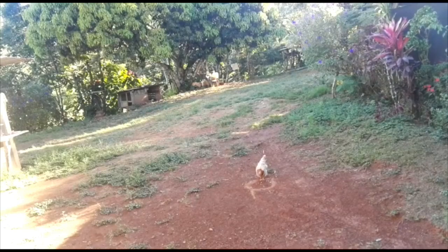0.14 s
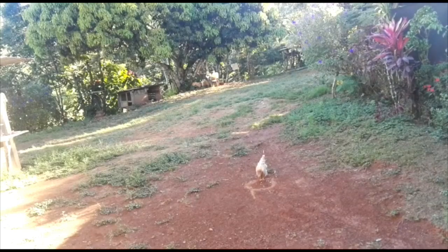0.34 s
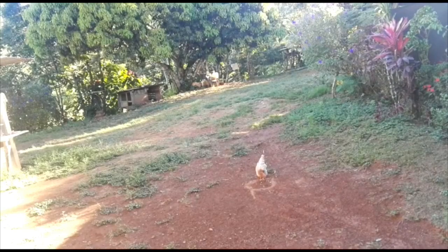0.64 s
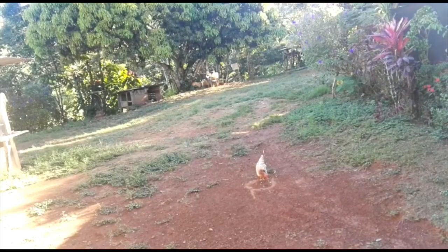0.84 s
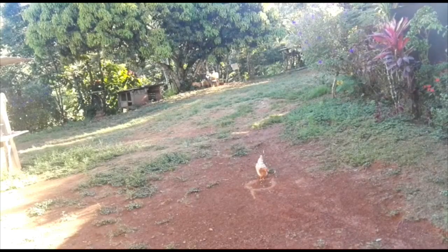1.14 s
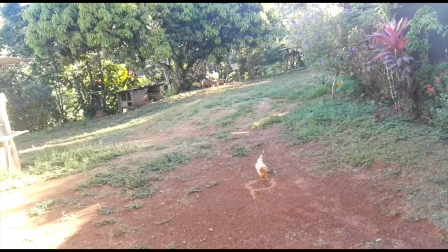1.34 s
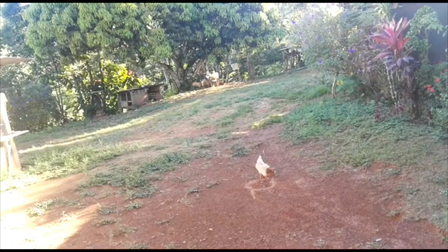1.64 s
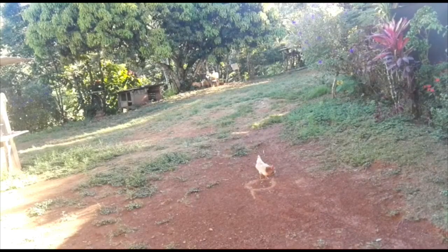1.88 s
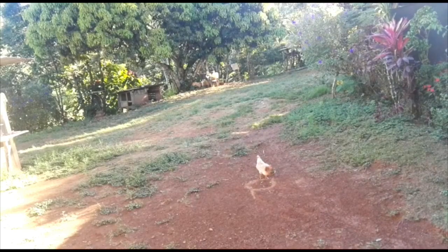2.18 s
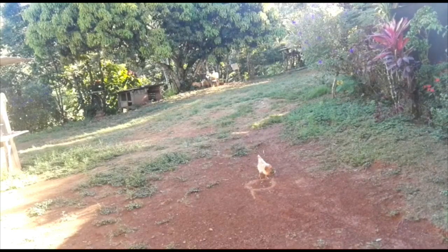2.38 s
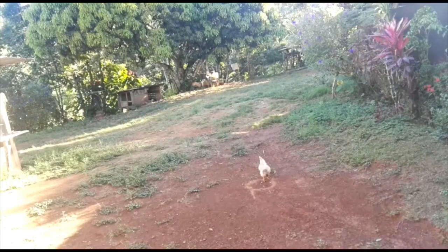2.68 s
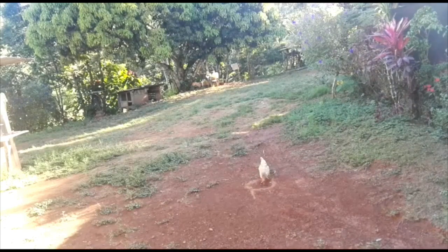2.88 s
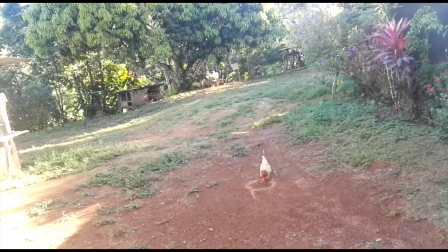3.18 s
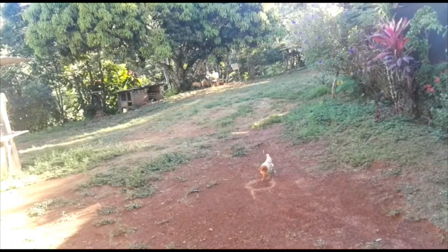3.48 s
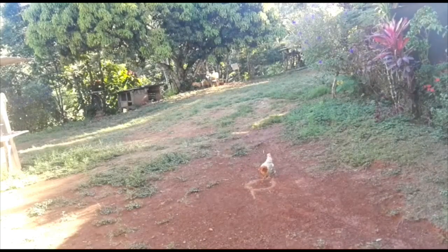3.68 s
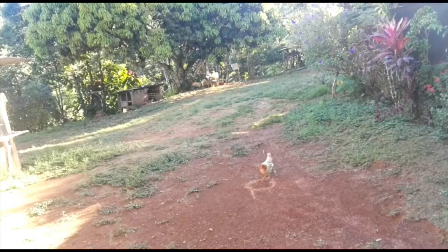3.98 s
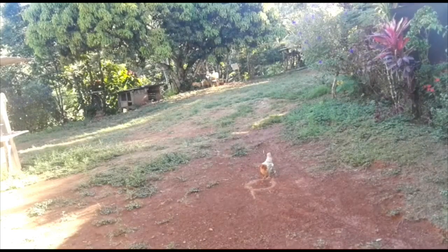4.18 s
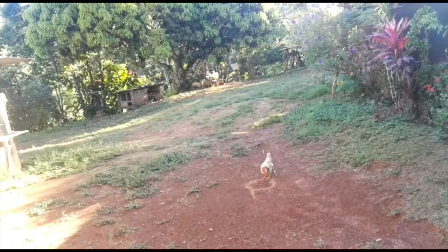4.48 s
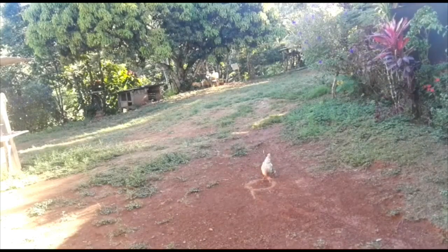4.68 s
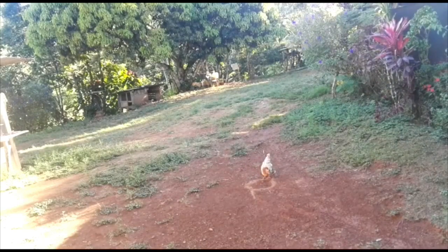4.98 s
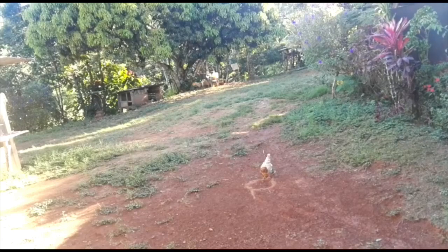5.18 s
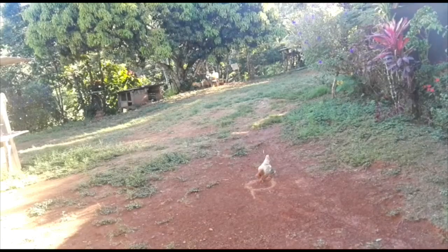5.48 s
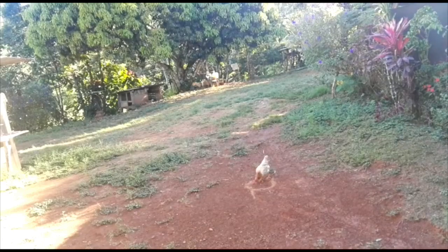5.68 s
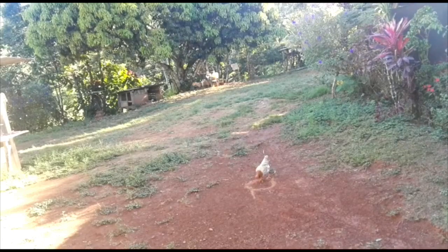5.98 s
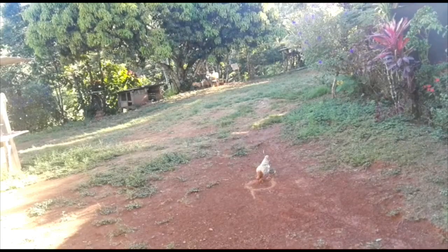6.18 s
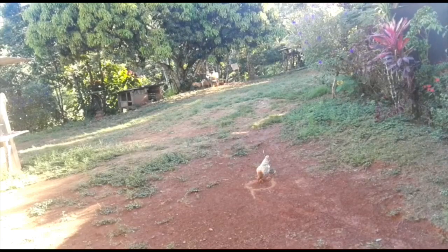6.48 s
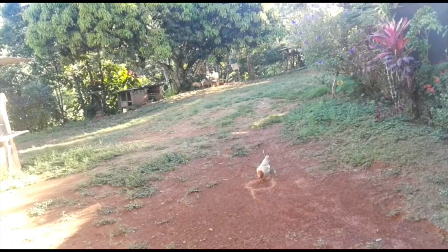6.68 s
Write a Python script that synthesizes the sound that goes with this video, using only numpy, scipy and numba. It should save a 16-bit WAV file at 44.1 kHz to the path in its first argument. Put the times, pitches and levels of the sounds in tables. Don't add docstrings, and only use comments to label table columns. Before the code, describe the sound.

A distant-to-middle-distance chicken calls in a grassy yard, picked up by a stereo microphone with soft air noise and muffled handling thumps. One long, rough squawk comes early; a few low clucks fill the pause; another long squawk starts strongly and turns ragged; a short dying squawk comes last. Trees return a faint diffuse echo, and high insects trill throughout.

```python
import sys
import numpy as np
from scipy import signal
from scipy.io import wavfile
from scipy.ndimage import uniform_filter1d
from numba import njit

SR = 44100
rng = np.random.default_rng(int(sys.argv[2]) if len(sys.argv) > 2 else 0)


def to_linear_factor(level_db):
    exponent = np.asarray(level_db, float) / 20
    return 10 ** exponent


def log_audio(samples):
    frames = np.atleast_2d(samples).T
    limited = np.clip(frames, -1, 1)
    pcm = np.round(limited * 32767).astype(np.int16)
    wavfile.write(sys.argv[1], SR, pcm)


N = 301644
T = np.arange(N) / SR
LEFT_LAG = 26


def rms_one(x):
    return x / np.sqrt(np.mean(x ** 2) + 1e-20)


def in_time(rows):
    s, *columns = np.transpose(rows)
    return [np.interp(T, s, c) for c in columns]


def gate(start, end, fade):
    return np.clip(np.minimum(T - start, end - T) / fade, 0, 1)


def drift(rate_hz):
    r = np.exp(-2 * np.pi * rate_hz / SR)
    noise = rng.standard_normal(N + SR)
    return rms_one(signal.lfilter([1], [1, -2 * r, r * r], noise)[SR:])


def resonance(x, hz, width_hz):
    r = np.exp(-np.pi * width_hz / SR)
    poles = [1, -2 * r * np.cos(2 * np.pi * hz / SR), r * r]
    return signal.lfilter([(1 - r * r) / 2, 0, (r * r - 1) / 2], poles, x + 1e-18)


def double_resonance(x, hz, width_hz):
    return resonance(resonance(x, hz, width_hz), hz, 2 * width_hz)


def band(x, low_hz, high_hz):
    return signal.sosfilt(signal.butter(2, [low_hz, high_hz], "band", fs=SR, output="sos"), x)


def even(x):
    return x / np.sqrt(uniform_filter1d(x ** 2, size=1800) + 1e-12)


def pan(x, left_db, lag=LEFT_LAG):
    left = np.roll(x, round(lag)) * to_linear_factor(left_db / 2)
    right = x * to_linear_factor(-left_db / 2)
    return np.array([left, right])


def pulses(cycles, count):
    turn = np.pi * (cycles % 1) + 1e-9
    return (np.sin((2 * count + 1) * turn) / np.sin(turn) - 1) / 2


def air(patchy_db):
    # frequency in Hz, level in dB per Hz.
    spectrum = [(25, -6.5), (50, 0), (80, -5.5), (200, -6), (400, -5), (1000, -4.5), (1700, -8.5),
                (2600, -12), (4500, -17), (6000, -14), (8000, -11.5), (11000, -25.5), (13400, -18),
                (14000, -20)]
    # frequency in Hz, left-right likeness from -1 to 1.
    likeness = [(60, 0.94), (130, 0.93), (280, 0.48), (620, -0.73), (1340, 0.3), (2920, -0.12),
                (6350, 0.096), (13800, 0.066)]
    # frequency in Hz, width in Hz, depth as a share (below 0 a hump).
    dips = [(5650, 510, 1), (7910, 3300, 0.82), (13800, 770, -0.88)]
    spectrum_hz, spectrum_db = np.transpose(spectrum)
    likeness_hz, likeness_share = np.transpose(likeness)
    out, edges, white = 0, 25 * 2 ** np.arange(0, 9.6, .5), rng.standard_normal((2, 2, N))
    together = drift(0.48)
    for k, (low, high) in enumerate(zip(edges, edges[1:])):
        mid, side = band(white[k % 2], low, high)
        at = np.log(low * high) / 2
        alike = np.clip(np.interp(at, np.log(likeness_hz), likeness_share), -1, 1)
        gain = to_linear_factor(np.interp(at, np.log(spectrum_hz), spectrum_db) + patchy_db * together)
        out = out + gain * (np.sqrt(1 + alike) * mid + np.sqrt(1 - alike) * side * [[1], [-1]])
    for hz, width_hz, depth in dips:
        out = out - depth * resonance(out, hz, width_hz)
    return to_linear_factor(-67) * rms_one(out)


def hum():
    # start in seconds, length in seconds, low mode in dB, upper modes in dB.
    rubs = [(-.05, 0.13, -67, -78), (0.524, 0.52, -75.5, -66.5), (1.0, 0.43, -71, -66.5),
            (1.838, 0.38, -60.5, -57), (2.19, 0.49, -68.5, -70.5), (2.758, .2, -61, -66),
            (2.901, 0.23, -70.5, -59), (3.367, 0.18, -61.5, -66), (3.591, 0.12, -62, -60),
            (4.35, 0.6, -75, -64.5), (5.8, .12, -65, -58), (5.951, 0.13, -69, -66.5)]
    # frequency in Hz, width in Hz, level in dB.
    body_modes = [(120.8, 29, -6.5), (207.5, 28.7, -7), (460.3, 39, -17), (620, 84, -39.5)]
    fade_s = 0.051
    low, upper = sum(gate(s, s + d, fade_s) * to_linear_factor([[low_db], [upper_db]]) for s, d, low_db, upper_db in rubs)
    rub = rng.standard_normal(N)
    modes = [to_linear_factor(db) * rms_one(double_resonance(rub, hz, w)) for hz, w, db in body_modes]
    return low * modes[0] + upper * sum(modes[1:])


def crickets():
    # frequency in Hz, level in dB, wobble in Hz, overlap of strokes as a share.
    singers = [(6613, -66, 48, 1.4), (6797, -66, 10.72, 1.3), (6710, -60.5, 28, 2.02), (7000, -70, 33, 2.7),
               (6940, -77.5, 12, 1.4), (7114, -76.5, 86, 0.88)]
    rates = [44.0, 38.2, 42.8, 35.5, 38.4, 40.0]
    # time in seconds, level in dB.
    vigour = [(0.0, -64), (0.8, -64), (1.14, -70.5), (1.54, -61), (2.44, -61.5), (2.53, -69.5),
              (2.91, -57.5), (3.01, -64.5), (3.11, -59.5), (3.24, -65.5), (3.89, -60), (4.17, -63),
              (5.7, -62), (6.17, -64.5), (6.63, -61), (6.84, -63)]
    # start in seconds, end in seconds, level in dB over the chorus.
    bouts = [
        (0.199, 0.92, 7.5),
        (1.399, 2.32, 9.5),
        (2.2, 3.1, -3.5),
        (2.85, 3.3, 4.5),
        (3.3, 6.9, 3),
    ]
    rest_db = -2
    low_db, = in_time(vigour)
    high_db = rest_db + sum((db + 5 - rest_db) * gate(s - .03, e + .03, .06) for s, e, db in bouts)
    out = np.zeros((2, N))
    for per_s, (hz, db, wobble_hz, overlap) in zip(rates, singers):
        swing = np.sin(2 * np.pi * (per_s * T + 0.2 * drift(2.76)))
        stroke = np.clip(overlap + swing, 0, 2) / (1 + overlap)
        level = stroke * to_linear_factor(db + 68 + low_db + high_db * (hz > 7000) + 1.4 * drift(8.6))
        for side in range(2):
            phase = 2 * np.pi * np.cumsum(hz + wobble_hz * drift(40.73)) / SR
            out[side] += level * np.sin(phase)
    return out * to_linear_factor([[3.5], [-3.5]])


def rustles():
    # start in seconds, decay in seconds, low edge in Hz, high edge in Hz, level in dB,
    # left-right difference in dB.
    stirs = [
        (0.0, 0.084, 3000, 5930, -61.5, -3),
        (.32, 0.073, 6940, 14800, -67, 14),
        (2.26, 0.056, 2420, 4630, -63, 1),
        (2.259, 0.069, 335, 520, -62.5, -3),
        (2.27, 0.068, 1080, 1250, -65.5, -3),
        (2.261, 0.035, 7500, 13930, -80, 4),
        (2.7, 0.048, 2460, 5900, -68, -1.5),
        (4.21, 0.037, 405, 5000, -71, -12),
    ]
    grains = rng.standard_normal((2, N)) * to_linear_factor(1.6 * drift(130))
    out = 0
    for s, decay, low_hz, high_hz, db, left_db in stirs:
        shape = np.clip((T - s) / 0.0022, 0, 1) * np.exp(-(np.maximum(T - s, 0) / decay) ** 2)
        level = to_linear_factor(db + left_db * np.array([[.5], [-.5]]))
        out = out + rms_one(band(grains, low_hz, high_hz)) * shape * level
    return out


def whistles():
    # start in seconds, length in seconds, start pitch in Hz, end pitch in Hz, level in dB,
    # left-right difference in dB.
    calls = [
        (0.3, 0.072, 2770, 2426, -75, 2),
        (0.366, 0.15, 11400, 10970, -85, 16),
        (2.673, 0.11, 1760, 1630, -79.5, -5),
        (2.729, 0.099, 1508, 1465, -75.5, -13),
        (5.407, 0.19, 1595, 1413, -78, -14.5),
        (5.706, 0.11, 1722, 1535, -77.5, -10),
    ]
    out, blur = 0, to_linear_factor(5.7 * drift(24))
    for s, length, start_hz, end_hz, db, left_db in calls:
        hz = np.interp(T, [s, s + length], [start_hz, end_hz])
        tone = np.sin(2 * np.pi * np.cumsum(hz) / SR) * gate(s, s + length, 0.026)
        out = out + pan(tone * blur * to_linear_factor(db), left_db)
    return out


@njit
def glide(x, hz, width_hz, rate):
    y = np.zeros(len(x))
    for i in range(2, len(x)):
        r = 1 - np.pi * width_hz[i] / rate
        y[i] = (1 - r) * (x[i] - x[i - 2]) + 2 * r * np.cos(2 * np.pi * hz[i] / rate) * y[i - 1] - r * r * y[i - 2]
    return y


def hen():
    # start in seconds, end in seconds, attack in seconds, release in seconds.
    squawks = [
        (.55, 1.42, 0.057, 0.052),
        (4.3, 5.06, 0.048, 0.069),
        (5.81, 6.014, 0.043, .11),
    ]
    # time in seconds, level in dB.
    pressure = [
        [(.6, -42), (.68, -40), (.73, -41.5), (.78, -42.5), (.92, -43), (1.03, -43.5), (1.2, -46),
         (1.31, -38.5), (1.39, -46.5)],
        [(4.35, -38.5), (4.43, -37), (4.5, -42.5), (4.54, -42.5), (4.65, -45), (4.72, -41), (4.78, -43),
         (4.88, -41), (4.99, -46)],
        [(5.86, -50.5), (5.9, -45), (5.93, -54.5)],
    ]
    # time in seconds, frequency in Hz.
    half_pitch = [
        [(.62, 280.4), (.69, 288.1), (.86, 279), (.98, 272), (1.02, 280), (1.2, 283), (1.27, 296), (1.4, 298)],
        [(4.36, 290.2), (4.41, 298.3), (4.49, 297.8), (4.53, 284.3), (4.65, 281), (4.9, 277.4), (4.98, 272.5)],
        [(5.88, 261.6), (5.91, 272), (6.0, 284.6)],
    ]
    # time in seconds, manner.
    manners = [(0, "burst"), (0.679, "paired"), (0.898, "plain"), (0.988, "rasp"), (1.26, "growl"),
               (3, "harsh"), (4.524, "fours"), (4.72, "firm"), (4.975, "broken"), (5.502, "bark"),
               (5.904, "dying")]
    swing = {"burst": (.2, 0, .3, .55), "harsh": (.25, 0, .3, .55), "paired": (.8, 0, 0, .03),
             "plain": (.03, 0, .03, .03), "rasp": (0, 0, .95, .4), "growl": (0, 0, 1, .25),
             "fours": (.9, .33, 0, .06), "firm": (.95, 0, 0, .025), "broken": (.3, 0, .3, .75),
             "bark": (.8, 0, .5, .4), "dying": (.5, 0, .5, .3)}
    posture = {"burst": (5.5, -5.5, -24, 1078.5, 1.24), "harsh": (1.5, -6, -22, 876.5, 1.97),
               "paired": (7.5, -6.5, -26.5, 995.5, 1.77), "plain": (4.5, -6, -32.5, 1080, 0.5),
               "rasp": (6, -3, -29.5, 922.5, 1.24), "growl": (4, -4.5, -28, 975, 1.1),
               "fours": (9.5, -1.5, -23, 871, 1.53), "firm": (9, -11.5, -27.5, 832, 1.58),
               "broken": (1.5, 0, -29, 867, 0.75), "bark": (4.5, -5, -52, 922, 1.7),
               "dying": (8, 3, -17, 1090, 1)}
    # opening time in seconds, level while shut in dB.
    opening_times = [
        (0.059, -24),
        (0.082, -37),
        (.1, -24.5),
    ]
    # time in seconds, frequency in Hz.
    mouth = [(.6, 2950), (1.4, 4950), (4.5, 3000), (4.6, 3900), (4.75, 3900), (4.85, 2603), (5.05, 2550),
             (5.85, 3994), (6.0, 4332)]
    # frequency in Hz, width in Hz, level in dB over the posture,
    # left-right difference in dB, left lag in samples.
    airway = [(548, 173, 9.5, -2, 30), (885, 164, -1, -6.5, -3), (1653.5, 104, 1, -5, 2.5),
              (1924, 280, -9, -4.5, 1.5), (3000, 250, -4, -6, 3), (3900, 520, -0.5, -0.5, 27),
              (6066, 520, 2.5, 0.5, 25.5), (10170, 280, -30.5, 31.5, 27.5), (12500, 2800, -22.5, 18, 31)]
    airway_edges = (490, 2250)
    attack_from_db, release_to_db, change_s = -15.5, -31.5, 0.039
    rise_from, rise_s = .69, .065
    growl_cycles, growl_slip = 3.5, .19
    breath_share = .13

    start, end, attack, release = np.array(squawks)[np.searchsorted([2.5, 5.5], T)].T
    since = T - start
    pipe_db = in_time(np.vstack(pressure))[0]
    pipe_db = pipe_db + attack_from_db * np.clip(1 - since / attack, 0, 1)
    pipe_db = pipe_db + release_to_db * np.clip(1 - (end - T) / release, 0, 1)
    sounding = gate(start, end, 0.05) * to_linear_factor(uniform_filter1d(pipe_db, size=900))

    now = np.searchsorted([s for s, _ in manners], T, "right") - 1
    held = np.array([swing[m] + posture[m] for _, m in manners])[now].T
    settings = uniform_filter1d(held, size=int(change_s * SR))
    pairs, fours, growl, chaos, throat_db, beak_db, rasp_db, throat_hz, wide = settings
    throat_db, beak_db, rasp_db = [db + shut_db * np.clip(1 - since / s, 0, 1)
                                   for db, (s, shut_db) in zip([throat_db, beak_db, rasp_db], opening_times)]

    rise = rise_from + (1 - rise_from) * np.clip(since / rise_s, 0, 1)
    half_hz = in_time(np.vstack(half_pitch))[0] * rise
    mouth_hz, = in_time(mouth)
    half = np.cumsum(half_hz * (1 + 0.001236 * drift(20))) / SR
    beat = np.cos(2 * np.pi * (half / growl_cycles + 0.15 * drift(5.9)))
    slip = chaos * 0.21 * drift(205) + growl * growl_slip * beat
    strength = 1 + pairs * np.cos(2 * np.pi * (half + slip / 2)) + fours * np.cos(np.pi * half + .7)
    strength = strength * (1 + growl * beat) * (1 - chaos / 2 + chaos * 1.67 * np.tanh(drift(370)))
    clean = strength * pulses(2 * half + slip, count=22)
    breath = strength * rng.standard_normal(N)

    top_db = uniform_filter1d(rasp_db + 11.0 * (pairs - chaos), size=2000)
    levels_db = [0, throat_db, beak_db, beak_db, rasp_db, rasp_db, top_db - 3.5, top_db, top_db]
    stretch = np.minimum(half_hz / 283, 1) ** 1.2
    out = 0
    for k, (hz, width_hz, db, left_db, lag) in enumerate(airway):
        centre = {1: throat_hz * stretch, 5: mouth_hz}.get(k, hz * stretch)
        damping = 1 + chaos * {0: .7, 1: 1.1, 2: .4}.get(k, 1.2)
        width = width_hz * (wide if k == 1 else 1) * damping
        ringing = clean + breath * breath_share * (hz / 600) ** 0.9
        for widen in (1, 1.5, 2.5):
            ringing = glide(ringing, centre, widen * width, SR)
        if k < 4:
            ringing = band(band(ringing, *airway_edges), *airway_edges)
        patchy = to_linear_factor(2.0 * drift(5) * (k > 3))
        voice = (-1) ** k * even(ringing) * patchy * to_linear_factor(db + levels_db[k]) * sounding
        out = out + pan(voice, left_db, lag)
    rough = chaos * pairs * 3.0 * even(band(breath, 310, 340))
    fundamental = (pairs * np.sin(2 * np.pi * half) + rough) * to_linear_factor(-14.5) * sounding
    return out + pan(fundamental, -6.5, 30)


def bush_cricket():
    # start in seconds, length in seconds, level in dB.
    rasps = [
        (0.709, 0.22, -76),
        (1.12, 0.3, -85),
        (1.675, 0.23, -83.5),
        (3.333, 0.2, -83.5),
        (4.166, 0.14, -78.5),
        (5.219, 0.15, -78),
        (6.092, 0.22, -84.5),
    ]
    high = rms_one(band(rng.standard_normal(N), 8200, 10400))
    low = rms_one(band(rng.standard_normal(N), 8400, 9300))
    out = 0
    for s, d, db in rasps:
        rasp = high * gate(s, s + 0.47 * d, 0.051) + low * gate(s + 0.18 * d, s + d, 0.17)
        out = out + to_linear_factor(db) * rasp
    return pan(out, 28)


def clucks():
    # start in seconds, length in seconds, pitch in Hz, level in dB.
    calls = [
        (2.0, 0.1107, 233.5, -49.5),
        (3.35, 0.1, 248, -40.5),
        (3.616, 0.1, 264, -50),
    ]
    # frequency in Hz, width in Hz, level in dB.
    throats = [
        [(245, 39, -27.5), (777, 51, 7.5), (1170, 110, -7), (1780, 140, -19.5)],
        [(253, 250, -18), (768.9, 100, 4), (1020, 130, -5), (1292, 31, -10), (1730, 310, -44.5)],
        [(264, 80, -8.5), (890, 96, 16.5), (1040, 120, -3), (1374, 170, 7.5), (2040, 830, -41.5)],
    ]
    peak_at, fade_db, rise = 0.26, -27.5, 0.11
    track = [row for s, d, hz, _ in calls for row in [(s, hz), (s + d, hz * (1 + rise))]]
    pitch_hz, = in_time(track)
    source = pulses(np.cumsum(pitch_hz) / SR + 0.031 * drift(65), count=9) * to_linear_factor(2.0 * drift(67))
    out = 0
    for (s, d, _, top_db), throat in zip(calls, throats):
        voice = sum(to_linear_factor(db) * even(double_resonance(source, hz, w)) for hz, w, db in throat)
        level_db = top_db + np.interp(T, [s, s + peak_at * d, s + d], [-6, 0, fade_db])
        out = out + voice * gate(s, s + d, 0.0039) * to_linear_factor(level_db - 2.5)
    return pan(out, 1.0)


def yard(x):
    # delay in milliseconds, level in dB.
    echo_paths = [
        [(.9, -5), (4.3, -9), (11.0, -38)],
        [(2.6, -14.5), (6.1, -3.5), (14.0, -37.5)],
    ]
    # 60 dB decay time in seconds, level in dB.
    slopes = [
        (0.346, -2),
        (1.6, -63.5),
    ]
    # delay in seconds, spread in seconds, level in dB.
    late_answer = (0.27, 0.66, -38.5)
    t, (delay, spread, far_db) = T[:2 * SR], late_answer
    tail = sum(to_linear_factor(db) * rms_one(to_linear_factor(-60 * t / t60)) for t60, db in slopes) * (t > .02)
    late = to_linear_factor(far_db) * rms_one(np.exp(-((t - delay) / spread) ** 2))
    leaves = rng.standard_normal((2, 2, len(t))) * 3 / np.sqrt(len(t))
    near = signal.fftconvolve(x, band(leaves[0], 800, 2600) * tail, axes=1)[:, :N]
    far = signal.fftconvolve(x, band(leaves[1], 820, 2100) * late, axes=1)[:, :N]
    swaying = to_linear_factor(3.0 * np.array([drift(12), drift(12)]))
    out = x + near + swaying * far
    for side, echoes in enumerate(echo_paths):
        for ms, db in echoes:
            out[side] -= to_linear_factor(db) * np.roll(x[side], round(ms * SR / 1000))
    return out


def scene():
    others = clucks()
    birds = yard(hen() + .08 * others + whistles()) + others
    return air(patchy_db=1.0) + hum() + crickets() + rustles() + birds + bush_cricket()


def low_pass(x):
    return signal.sosfilt(signal.butter(12, 14250, fs=SR, output="sos"), x)


def record(dry):
    return low_pass(dry)


dry = scene()
out = record(dry)
log_audio(out)
```